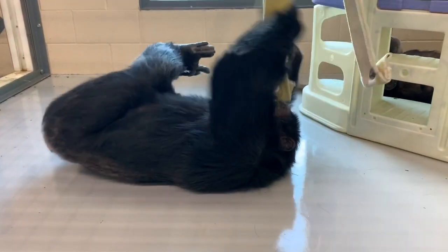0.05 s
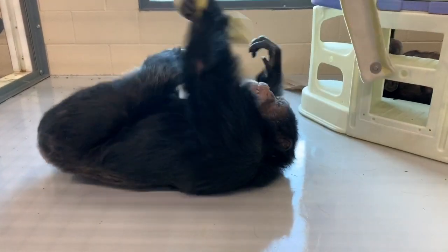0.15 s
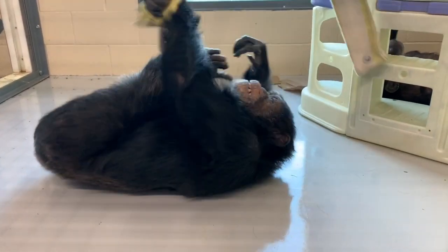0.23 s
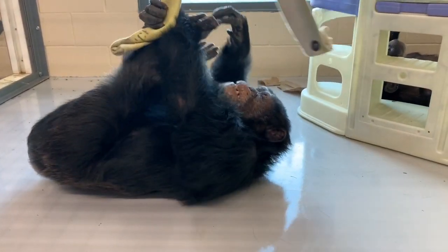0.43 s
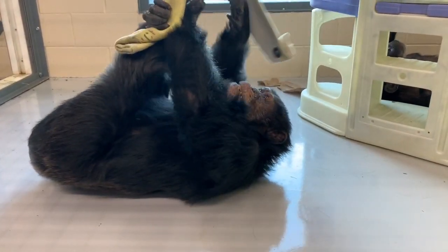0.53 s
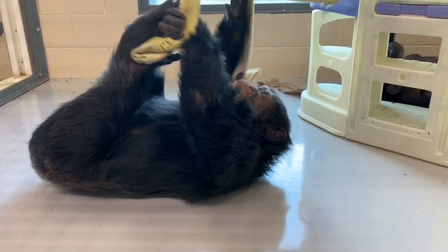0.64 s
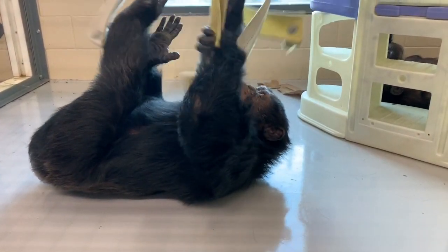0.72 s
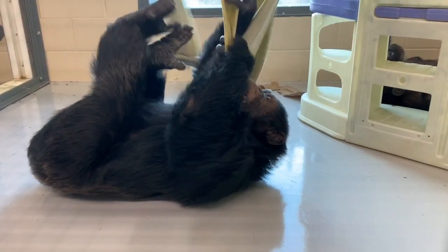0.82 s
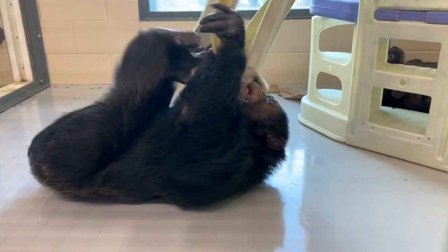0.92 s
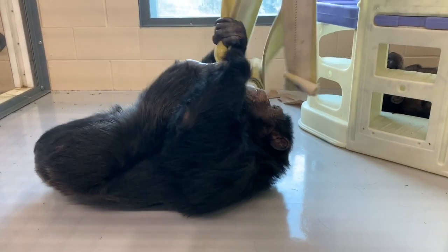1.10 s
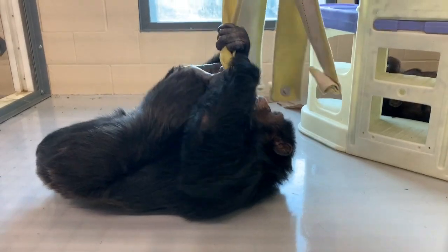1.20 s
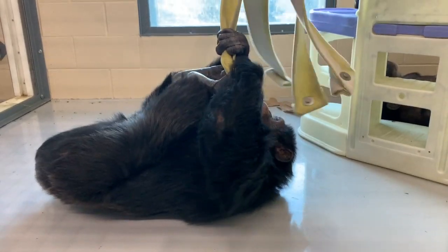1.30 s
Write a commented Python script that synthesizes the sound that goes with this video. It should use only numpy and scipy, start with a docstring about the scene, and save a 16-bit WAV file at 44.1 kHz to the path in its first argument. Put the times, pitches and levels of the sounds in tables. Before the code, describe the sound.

A loud, hollow boom echoes through a large hard-walled enclosure, just after a few light knocks and close ticks. As it fades, a moving chimpanzee makes soft bumps, a scuff and a small clack over low ventilation rumble.

```python
"""Chimpanzee in a hard-walled enclosure

A chimpanzee rolls on the floor of a large hall and tugs at hanging straps, heard on a stereo pair.
Something hollow is struck once: a crack, then a boom that rings on in the hall. Close ticks, distant
knocks, soft bumps, a scuff, a clack and a faint rustle lie over the rumble of the ventilation."""
import sys
import numpy as np
from scipy import signal
from scipy.io import wavfile
from scipy.ndimage import uniform_filter1d

SR = 44100
rng = np.random.default_rng(int(sys.argv[2]) if len(sys.argv) > 2 else 0)


def digitize_waveform(pressure):
    """Quantize a signal to 16-bit integers and store it at the path in sys.argv[1].

    Rows of a 2-D input are taken as channels; values are limited to [-1, 1].
    """
    field = np.atleast_2d(pressure).T
    bounded = np.clip(field, -1, 1)
    quanta = np.round(bounded * 32767).astype(np.int16)
    wavfile.write(sys.argv[1], SR, quanta)


N = 59535
T = np.arange(N) / SR
BAND_EDGES_HZ = 22 * 2 ** (np.arange(30) / 3)   # third octaves
BAND_CENTRES_HZ = np.sqrt(BAND_EDGES_HZ[1:] * BAND_EDGES_HZ[:-1])
OPPOSITE = np.array([[1], [-1]])   # plus on the left microphone, minus on the right


def from_db(db):
    """Decibels to gain."""
    return 10 ** (np.asarray(db) / 20)


def per_band(points):
    """Read a frequency table at the band centres."""
    hz, value = np.transpose(points)
    return np.interp(np.log(BAND_CENTRES_HZ), np.log(hz), value)


def fade(t60_s, rise_s=1e-5):
    """Quick rise and exponential decay."""
    return np.exp(-np.log(1000) * T / t60_s) * (1 - np.exp(-T / rise_s))


def at(start_s, x):
    """Start a stereo sound at the given time."""
    return np.pad(x, ((0, 0), (max(int(start_s * SR), 0), 0)))[:, :N]


def butter(x, order, hz, kind):
    """Pass a sound through a Butterworth filter."""
    return signal.sosfilt(signal.butter(order, hz, kind, fs=SR, output="sos"), x)


def steady(x, samples):
    """Even out the slow swings of a noise's power."""
    return x / np.sqrt(uniform_filter1d(x ** 2, samples, axis=-1) + 1e-12)


def grain(step_s):
    """A random flicker that glides to a new value every step."""
    return np.interp(T / step_s, np.arange(N), rng.standard_normal(N))


def diffuse(colour):
    """Noise from all round the microphones, in bands (bands x 2 x N) that add up to unit power."""
    # how alike the two microphones hear it: frequency_hz, correlation
    likeness = [(85, 0.92), (170, 0.93), (350, 0.57), (700, 0.07), (1500, 0), (5000, 0.05), (12000, 0)]
    power = from_db(per_band(colour)) ** 2 * np.diff(BAND_EDGES_HZ)
    white = rng.standard_normal((2, 2, N + SR // 4))
    bands = []
    for k, alike in enumerate(per_band(likeness)):
        noise = butter(white[k % 2], 2, BAND_EDGES_HZ[k:k + 2], "band")[:, -N:]
        mid, side = steady(noise, samples=3500)
        stereo = np.sqrt(1 + alike) * mid + np.sqrt(1 - alike) * side * OPPOSITE
        bands.append(np.sqrt(power[k] / power.sum() / 2) * stereo)
    return np.array(bands)


def hall_tail(bands, rise_s):
    """Reverberation: each band dies away at the hall's own rate."""
    # reverberation time of the hall: frequency_hz, t60_s
    decay = [(60, 1.7), (160, 1.085), (400, 1.23), (1000, 1.33), (3000, 1.53), (8000, 0.88), (15000, .5)]
    return sum(band * fade(t60_s, rise_s) for band, t60_s in zip(bands, per_band(decay)))


def ring(modes, rise_s=1e-5, spread_rad=0., rise_cycles=0):
    """Decaying modes of alternating sign; the spread puts the two microphones out of step."""
    skew = spread_rad * rng.choice([-1, 1], len(modes))
    out = 0
    for k, (hz, db, t60_s) in enumerate(modes):
        envelope = from_db(db) * fade(t60_s, rise_s + rise_cycles / hz)
        out = out + (-1) ** k * envelope * np.sin(2 * np.pi * hz * T + skew[k] * OPPOSITE)
    return out


def resonant(x, peaks):
    """Lift resonances out of a sound."""
    for hz, width_hz, boost_db in peaks:
        peak = signal.lfilter(*signal.iirpeak(hz, hz / width_hz, fs=SR), x)
        x = x + (from_db(boost_db) - 1) * peak
    return x


def ventilation():
    """Room tone: ventilation hiss, and a rumble that swells in the hall's lowest resonance."""
    # colour of the moving air: frequency_hz, relative_density_db
    air_colour = [(25, -24), (42, -20), (66, -4), (95, 3.5), (140, 0), (250, -7.5), (550, -6),
                  (1300, -18.5), (2300, -17.5), (4500, -35.5), (9000, -41.5), (16000, -60)]
    # swell of the rumble: time_s, level_db
    swell = [(0, -58.5), (.1, -48), (.45, -39.5), (.7, -47), (.9, -47), (1.05, -57), (1.14, -59),
             (1.35, -59)]
    rumble_hz = 66.6
    b, a = signal.iirpeak(rumble_hz, Q=rumble_hz / 16.4, fs=SR)
    white = rng.standard_normal(N + SR)
    rumble = signal.lfilter(b, a, signal.lfilter(b, a, white))[SR:]
    rumble_db = np.interp(T, *np.transpose(swell))
    return from_db(-50) * diffuse(air_colour).sum(0) + from_db(rumble_db) * steady(rumble, samples=6000)


def rustle():
    """Straps and fur slide with a faint, grainy hiss."""
    # rise and fall of the sliding: time_s, level_db
    swell = [(0, -63), (.1, -60.5), (.2, -48.5), (.38, -63), (.47, -57), (.6, -58), (.68, -56.5),
             (.81, -65.5), (.89, -60.5), (.94, -57.5), (1.05, -54.5), (1.15, -59.5), (1.21, -74),
             (1.35, -85)]
    # colour of the hiss: frequency_hz, relative_density_db
    colour = [(1500, -22), (4000, 1), (7200, -4), (10000, -2), (12500, -16), (16000, -2)]
    level_db = np.interp(T, *np.transpose(swell)) + 2 * grain(step_s=0.0012)
    return from_db(level_db) * diffuse(colour).sum(0)


def distant_knocks():
    """Dull knocks farther off, reaching the microphones mostly as reflections."""
    # the knocks: start_s, level_db
    hits = [(.001, -41), (.045, -53), (.103, -43.5), (.155, -37), (.186, -38), (.660, -40), (.747, -37),
            (.848, -42.5), (.862, -42.5), (.875, -44.5), (.882, -38.5), (.954, -47), (.970, -47),
            (1.085, -59), (1.150, -47), (1.212, -64)]
    # their colour: frequency_hz, relative_density_db
    colour = [(80, -0.5), (200, -0.5), (550, 1.5), (900, 1.5), (1500, -1), (2100, -4.5), (2900, -13),
              (5000, -19), (12000, -49)]
    bands, out = diffuse(colour), 0
    for start_s, db in hits:
        own_bands = np.roll(bands, rng.integers(N), axis=-1)   # another stretch of noise for each
        knock = own_bands.sum(0) * fade(t60_s=0.11, rise_s=.0008)
        hall = from_db(-9.5) * hall_tail(own_bands, rise_s=0.016)
        out = out + from_db(db) * at(start_s, knock + hall)
    return out


def floor_bumps():
    """Limbs and back meet the floor with soft, low thuds."""
    # the thuds: start_s, pitch_hz, level_db
    thuds = [(.003, 272, -35.5), (0.068, 67, -37.5), (0.099, 130, -38.5), (0.104, 193.5, -38),
             (0.196, 248, -37), (0.663, 72, -30), (1.012, 68, -34.5), (1.031, 116, -40),
             (1.275, 339, -44.5)]
    t60_s = 0.18
    return sum(at(start_s, ring([(hz, db, t60_s)], rise_s=0.0086)) for start_s, hz, db in thuds)


def close_ticks():
    """Tiny bright contacts near the microphones, with a short wash of reflections."""
    # the contacts: start_s, level_db
    hits = [(0.1479, -24.5), (0.1516, -18.5), (0.153, -29), (0.856, -39), (.863, -39), (.872, -37),
            (0.8802, -36)]
    # what a tick rings with: pitch_hz, relative_level_db, t60_s
    modes = [(8840, -1.5, 0.0018), (10150, -6, 0.0041), (13500, 10.5, 0.00067)]
    direct = sum(from_db(db) * at(start_s, ring(modes, spread_rad=1.0)) for start_s, db in hits)
    direct = butter(direct, 2, hz=5400, kind="high")
    room = rng.standard_normal((2, N)) * fade(t60_s=0.12, rise_s=0.00079)
    room /= np.sqrt(N * np.mean(room ** 2))   # unit energy
    return direct + from_db(-3.5) * signal.fftconvolve(direct, room, axes=1)[:, :N]


def snap():
    """The first instant of a hard contact: a few milliseconds of bright noise."""
    burst = rng.standard_normal((2, N)) * fade(t60_s=0.0085)
    return butter(burst, 1, hz=[2460, 11000], kind="band")


def hollow_body():
    """One push starts all modes, the low ones swelling more slowly; the nearest wall repeats it."""
    # modes of the hollow body: pitch_hz, level_db, t60_s
    modes = [(81.3, -21.5, 0.49), (150, -26, 0.37), (235.8, -12, 0.18), (314, -8, .11), (349, -14.5, 0.17),
             (427.4, -5.5, .1), (466, -13, 0.105), (536, -23, 0.045), (710, -25, 0.16), (791, -21.5, 0.19),
             (1216, -28, 0.13)]
    direct = sum(ring([mode], spread_rad=0.15, rise_cycles=0.38) for mode in modes)
    wall_echo = at(start_s=.0172, x=direct[::-1])   # left and right swapped
    return direct + from_db(-6) * wall_echo


def boom_reflections():
    """The blow comes back off the near walls, then as a long tail from the whole hall."""
    # colour of the near reflections: frequency_hz, relative_density_db
    early_colour = [(40, -21), (80, -9), (200, -1), (430, 0), (600, -4.5), (1300, -11), (1900, -19.5),
                    (3400, -18), (5500, -31.5), (9000, -36), (15000, -47)]
    # colour of the tail: frequency_hz, relative_density_db
    tail_colour = [(40, -41), (75, -6.5), (110, -7), (160, -0.5), (260, -0.5), (450, -4), (600, -10),
                   (850, -13), (1300, -20), (2000, -25.5), (3300, -30), (6000, -41.5), (15000, -63)]
    # resonances that colour both: centre_hz, width_hz, boost_db
    resonances = [(131.5, 24, 9), (173, 30, 6), (225, 21.5, 7.5), (266, 19, 4), (316.7, 26, 5),
                  (425.5, 42, 7.5), (462, 46, 3.5), (677, 25, 5), (793, 77, 4.5), (1202, 59, 9),
                  (1516, 34, 4.5), (1992, 43, 9), (2456, 68, 6)]
    rise_cycles = 1.2
    early = sum(band * fade(t60_s=0.27, rise_s=rise_cycles / hz)
                for band, hz in zip(diffuse(early_colour), BAND_CENTRES_HZ))
    tail = hall_tail(diffuse(tail_colour), rise_s=0.024)
    return resonant(from_db(-16) * early + from_db(-20.5) * tail, resonances)


def hollow_blow():
    """The contact cracks, the hollow body gives way just after, and the hall builds to a boom."""
    # modes of the contact crack: pitch_hz, level_db, t60_s
    crack_modes = [(910, -28, 0.018), (1215, -13, 0.039), (1537, -15, 0.02), (2007, -27.5, .06),
                   (2390, -27.5, .08), (3106, -29.5, 0.045), (3620, -19.5, 0.016)]
    # standing waves of the hall: pitch_hz, level_db, t60_s
    hall_modes = [(67.4, -51, 1.1), (135.6, -25, 1.28), (165.5, -26.5, 1.66), (177.5, -26.5, 1.16),
                  (226.4, -16.5, 0.86), (274, -32.5, 1.52), (281.5, -24, 1.2), (312.5, -26.5, 0.67),
                  (426, -29.5, 1.25), (434, -28.5, 1.04), (481, -29, 1.2), (718, -35, 0.7),
                  (784, -39.5, 1.4), (1216, -34, 0.53), (2003, -51, 0.76), (2130, -51, 0.41)]
    start_s, body_lag_s, left_minus_right_db = .2373, .0032, -0.7
    crack = ring(crack_modes, rise_s=0.00012, spread_rad=0.62) + from_db(-21.5) * snap()
    boom = hollow_body() + ring(hall_modes, rise_s=0.038, spread_rad=0.15)
    pan = from_db(left_minus_right_db / 2 * OPPOSITE)
    return at(start_s, crack + pan * at(body_lag_s, boom) + boom_reflections())


def scuff():
    """A short grainy scrape presses harder towards its end, stops and leaves a little reverberation."""
    # colour of the scrape: frequency_hz, relative_density_db
    colour = [(150, -20), (450, -13), (650, 1.5), (1100, -2), (1450, 2), (2050, -5), (2800, -27),
              (6000, -32)]
    start_s, length_s, swell_db = .848, .04, 3
    rub_db = swell_db * np.minimum(T / length_s, 1) + 2.5 * grain(step_s=.002)
    rub = (T < length_s) * from_db(rub_db)
    room = from_db(-8) * fade(t60_s=0.63, rise_s=length_s / 2)
    return at(start_s, from_db(-45.5) * diffuse(colour).sum(0) * (rub + room))


def strap_clack():
    """A strap's end hits hard plastic: one bright clack and its splash in the room."""
    # what the hit rings with: pitch_hz, relative_level_db, t60_s
    modes = [(964, -2, 0.072), (2990, -12.5, 0.13), (5170, -11, .02), (6540, -0.5, 0.018),
             (8760, -4, 0.016), (9640, -9, 0.039), (13400, -3, .01)]
    # colour of the splash: frequency_hz, relative_density_db
    splash_colour = [(300, -5), (2700, 5), (3600, -30), (5200, 2), (7300, -0.5), (9300, 2), (11500, -27),
                     (14500, -10)]
    splash = from_db(-41) * diffuse(splash_colour).sum(0) * fade(t60_s=0.25, rise_s=.001)
    hit = from_db(-36) * ring(modes, spread_rad=0.55) + from_db(-38) * snap()
    return at(start_s=.9533, x=hit + splash)


def jostle():
    """Something is jostled and gives a faint, lingering ring."""
    # its modes: pitch_hz, level_db, t60_s
    modes = [(520, -49, 0.85), (1240, -47.5, 0.14), (1765, -59.5, 1), (3800, -64, 0.39), (4370, -63, 0.33)]
    return at(start_s=1.147, x=ring(modes, rise_s=0.0028, spread_rad=0.59))


def scene():
    """The enclosure from the microphone position: one loud blow among small movements and room tone."""
    return (hollow_blow() + distant_knocks() + scuff() + floor_bumps() + close_ticks()
            + strap_clack() + jostle() + rustle() + ventilation())


def record(dry):
    """The microphones thin the deep bass and colour the treble; peaks are rounded and the top is cut."""
    # resonances of the microphone ports: centre_hz, width_hz, boost_db
    ports = [(9270, 1260, 7), (13700, 880, 2.5)]
    low_cut_hz, high_cut_hz, ceiling = 38, 15800, .92
    coloured = resonant(butter(dry, 2, low_cut_hz, "high"), ports)
    rounded = coloured / (1 + (np.abs(coloured) / ceiling) ** 6) ** (1 / 6)
    return signal.sosfilt(signal.ellip(10, .1, 90, high_cut_hz, fs=SR, output="sos"), rounded)


dry = scene()
out = record(dry)
digitize_waveform(out)
```